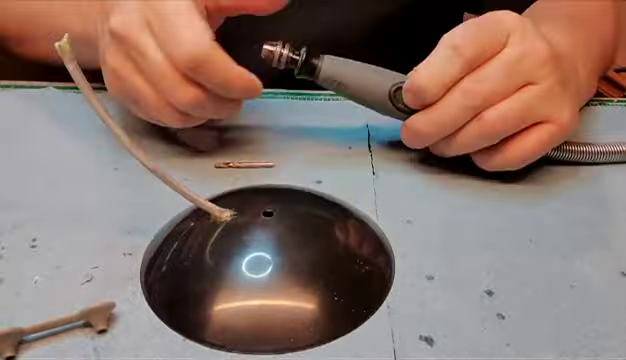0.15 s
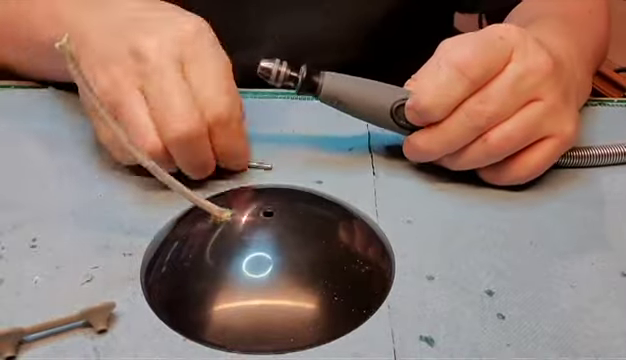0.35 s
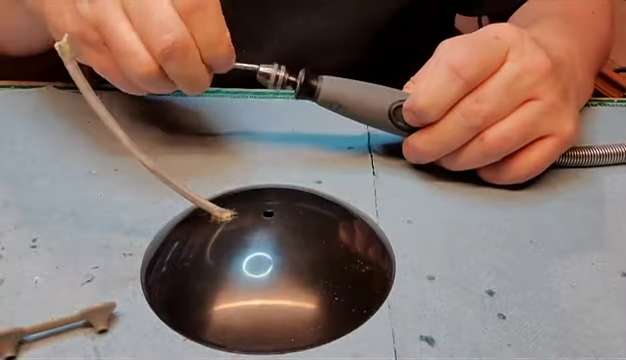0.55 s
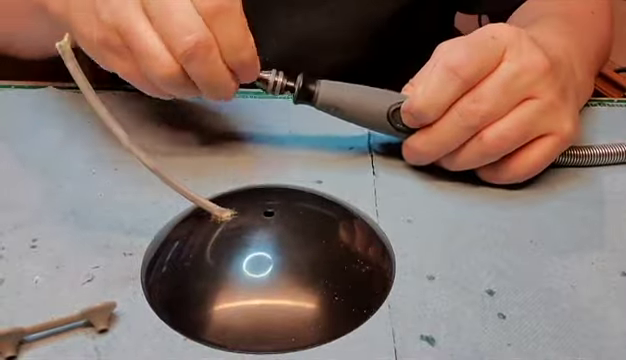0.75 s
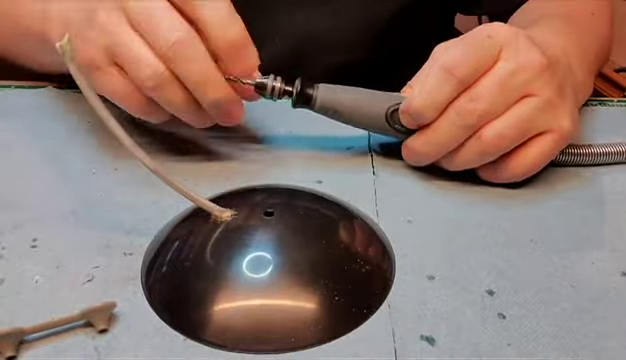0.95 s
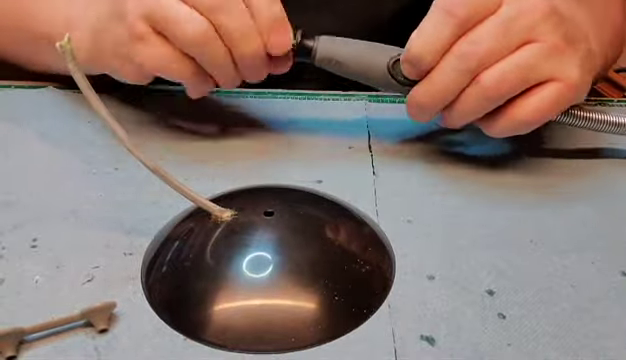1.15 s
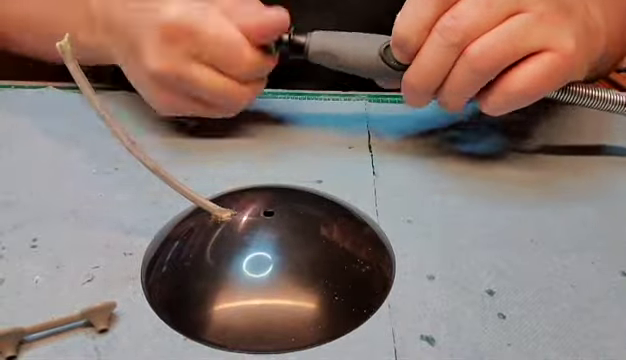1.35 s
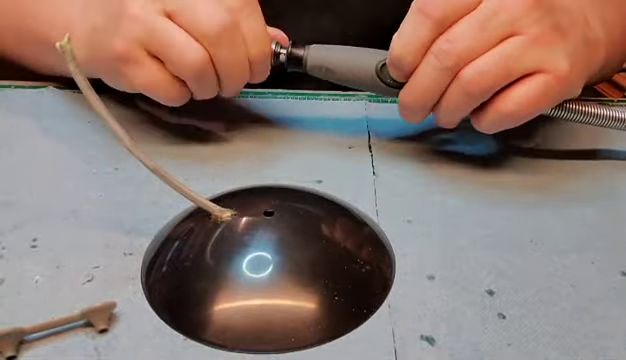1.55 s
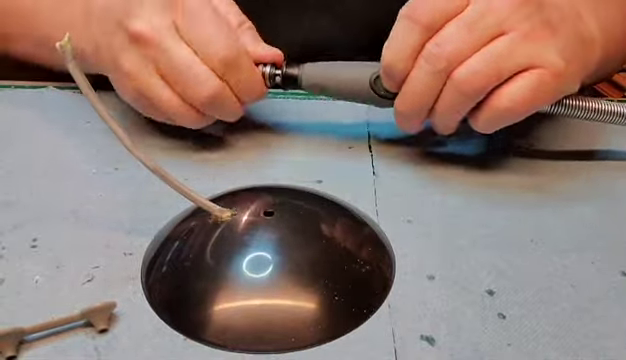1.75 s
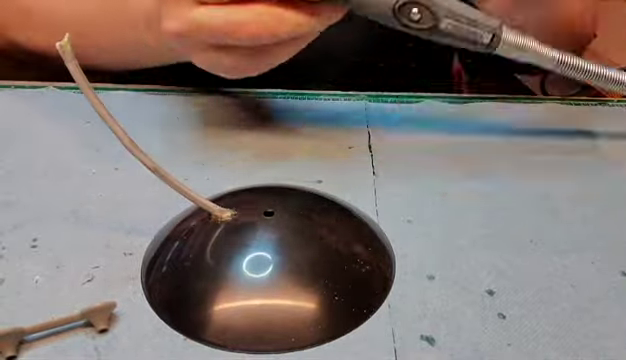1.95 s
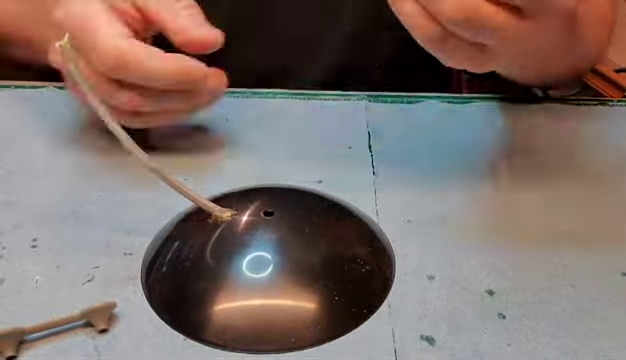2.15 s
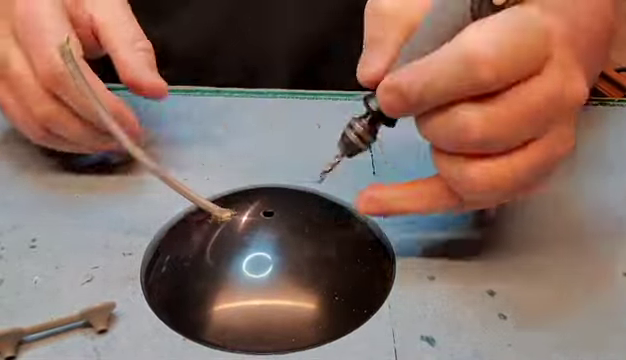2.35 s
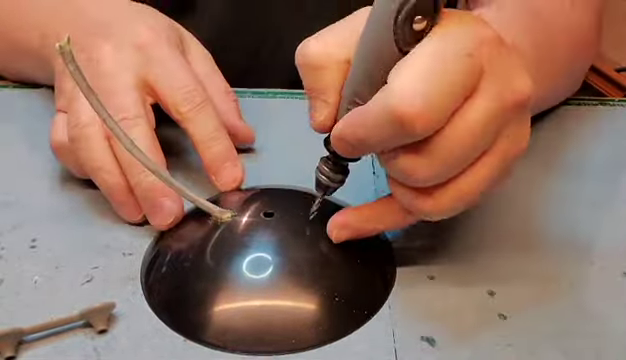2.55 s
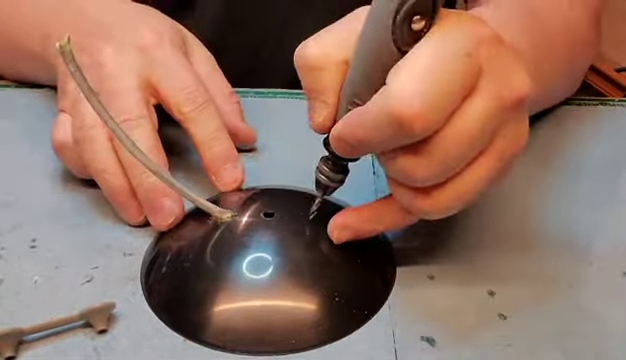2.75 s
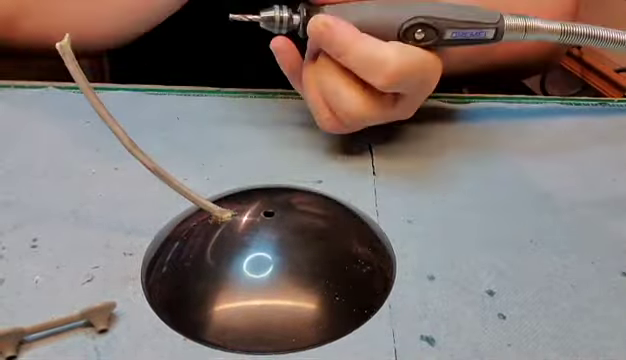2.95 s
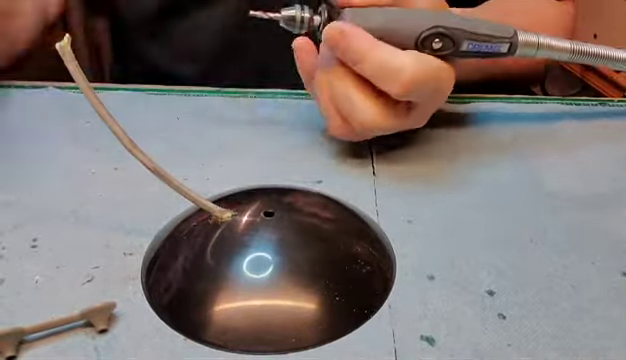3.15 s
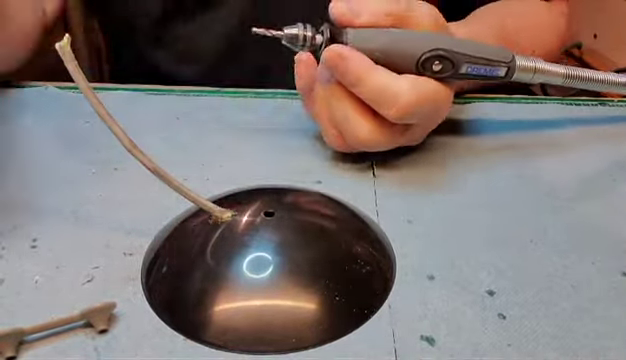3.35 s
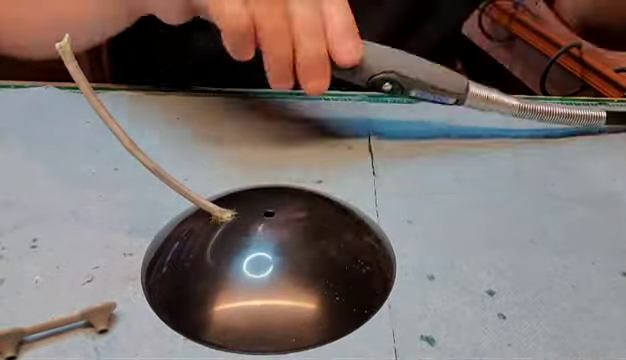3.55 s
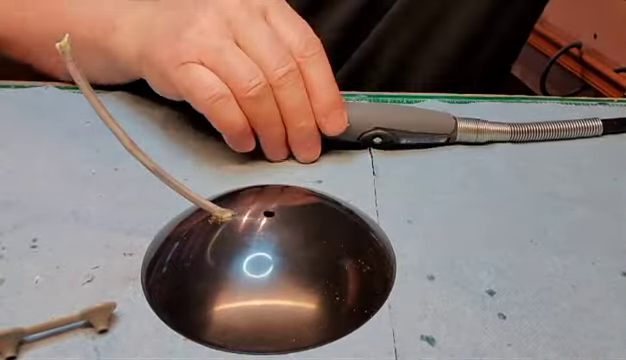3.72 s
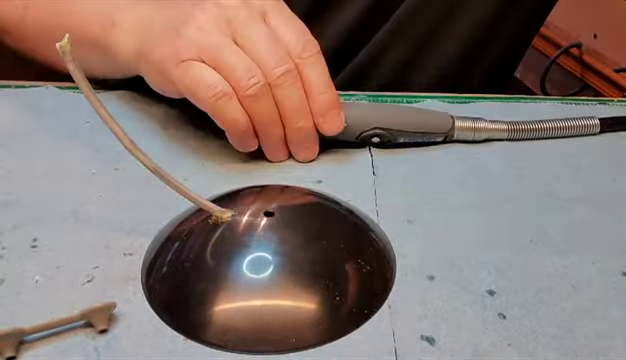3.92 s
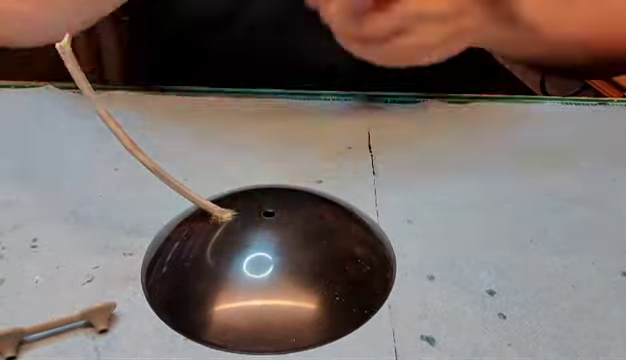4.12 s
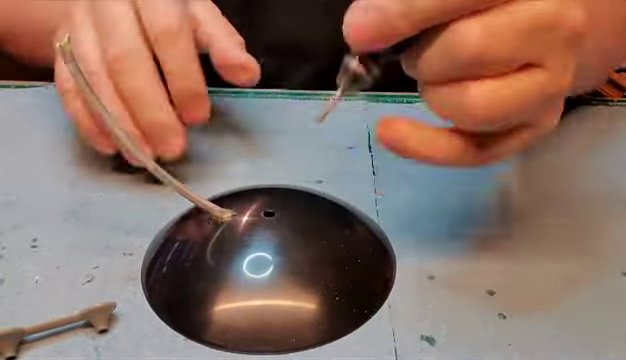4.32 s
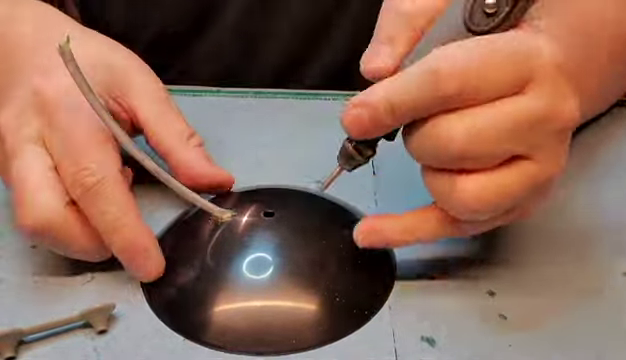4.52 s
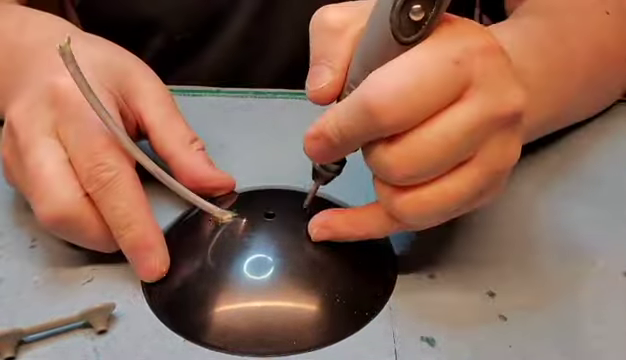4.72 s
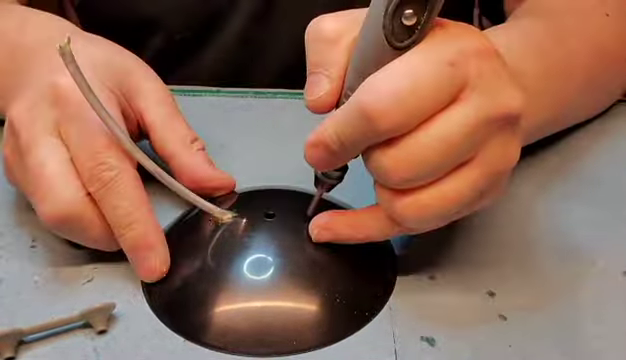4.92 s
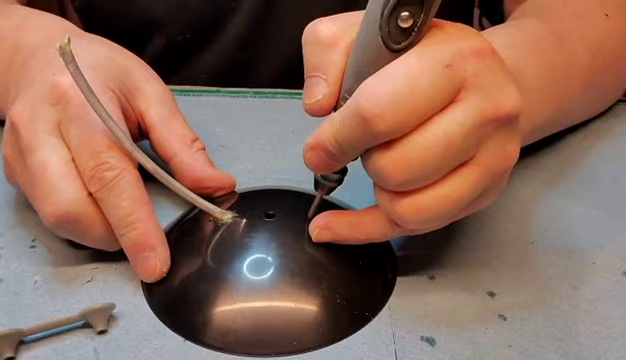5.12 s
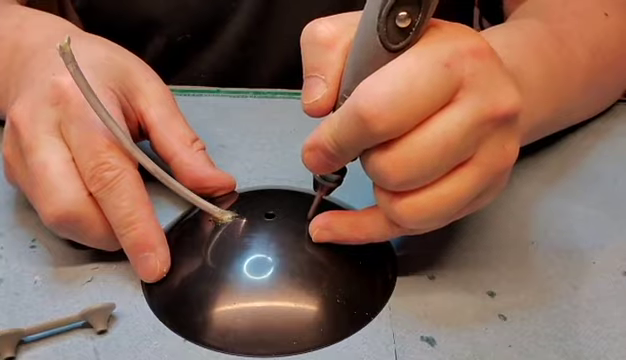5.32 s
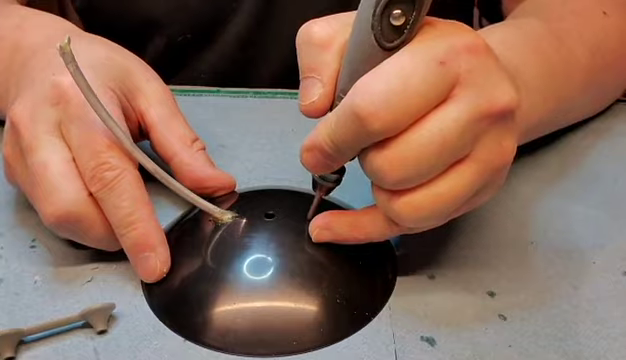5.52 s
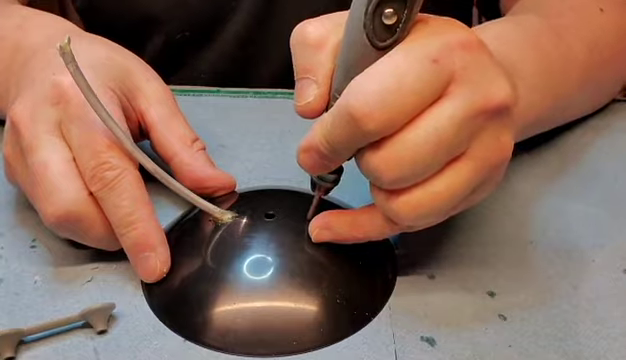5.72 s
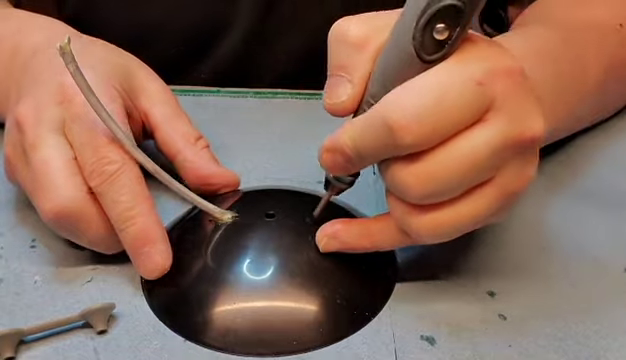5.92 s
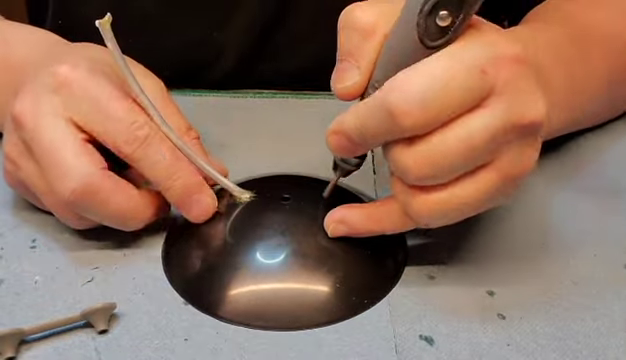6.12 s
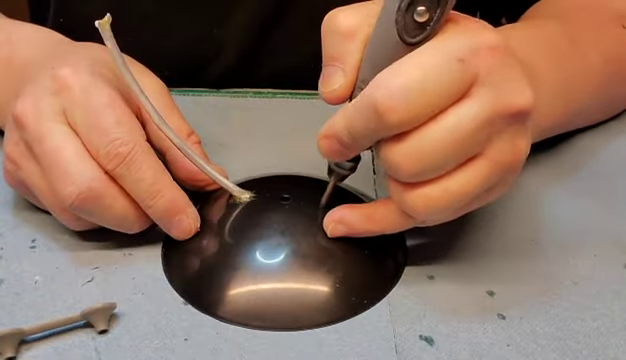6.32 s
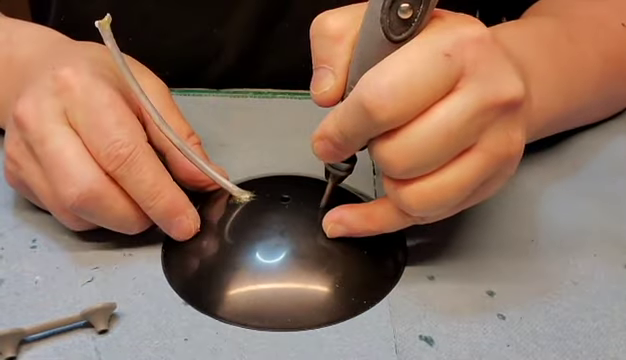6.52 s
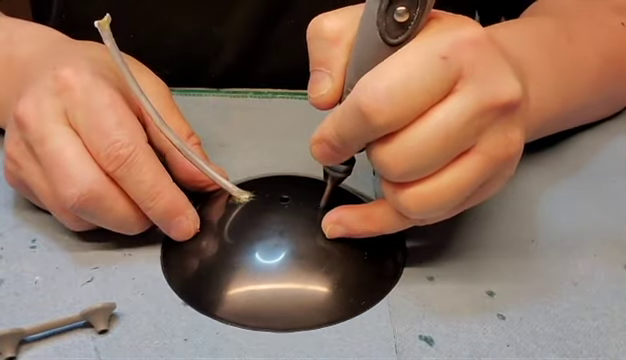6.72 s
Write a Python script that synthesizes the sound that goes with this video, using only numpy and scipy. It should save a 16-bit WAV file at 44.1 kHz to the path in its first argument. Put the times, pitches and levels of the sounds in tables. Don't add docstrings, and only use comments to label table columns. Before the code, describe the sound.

Nearly four seconds of very quiet fumbling: ticks of chuck and bit, brushing sleeves, muted thuds on the bench, a far engine hum growing behind. A sharp switch click starts a small high-speed motor, which howls upward within half a second into steady airy whine. Two buzzing presses on plastic follow, then free running, hard crackling chatter and short final bites. Close stereo microphone, dry small room, tool slightly left.

```python
import sys
import numpy as np
from scipy import signal
from scipy.io import wavfile
from scipy.ndimage import uniform_filter1d

SR = 44100
rng = np.random.default_rng(int(sys.argv[2]) if len(sys.argv) > 2 else 0)


def int16_out(signal):
    q = np.round(np.clip(np.atleast_2d(signal).T, -1, 1) * 32767)
    wavfile.write(sys.argv[1], SR, q.astype(np.int16))


def voltage_ratio(level):
    return 10 ** (np.asarray(level, float) / 20)


N = 302967

# [time_s, turns_hz]
SPEED = [(3.83, 278.5), (3.89, 347.6), (3.92, 469.4), (3.96, 568), (3.99, 635), (4.055, 716), (4.128, 775),
         (4.2, 797), (4.31, 826.6), (4.62, 868), (5.07, 886), (5.41, 895.8), (5.8, 883.3), (6.02, 907),
         (6.27, 919.7), (6.46, 923.3), (6.62, 897), (6.82, 851.5)]
# first, second, third and upper orders, then cutting noise [level_db]
SNAG_DB = (-19, -3.5, -25, -22, -5.5)
START_S = SPEED[0][0]
RIPPLE_HZ = 360
WOBBLE = 0.067
TOUCH_EDGE_S = 0.006


def since(s):
    return np.arange(N) / SR - s


def curve(rows):
    s, *columns = np.transpose(rows)
    return [np.interp(since(0), s, column) for column in columns]


def evened(x):
    return x / np.sqrt(np.mean(x ** 2) + 1e-20)


def read(points, hz):
    f, value = np.transpose(points)
    return np.interp(np.log(hz + 1), np.log(f + 1), value)


def drift(seconds):
    width = max(round(seconds * SR), 2)
    wander = uniform_filter1d(rng.standard_normal(N), width)
    return evened(uniform_filter1d(wander, width))


def swell(start, attack, hold, release_db, db):
    t = since(start)
    return np.clip(t / attack, 0, 1) * voltage_ratio(db - release_db * np.maximum(t - attack - hold, 0))


def resonate(x, hz, width):
    turn = np.exp(2j * np.pi * np.cumsum(hz * np.ones(x.shape[-1])) / SR)
    r = np.exp(-np.pi * width / SR)
    return 2 * (turn * signal.lfilter([1 - r], [1, -r], x / turn)).real


def resonate_twice(x, hz, width):
    return resonate(resonate(x, hz, width), hz, width)


def noise(spectrum, patchy_db, size=512, near_left=False):
    # [frequency_hz, likeness]
    likeness = [(60, 0.95), (300, 0.97), (1000, 0.85), (2500, 0.3), (4500, 0.05), (8000, 0.75),
                (15000, 0.4)]
    # [frequency_hz, lead_rad]
    left_lead = [(400, -0.26), (1500, 1.6), (4000, 0.78), (6500, 2.4), (12000, -0.45)]
    frames, hz = 4 * N // size + 6, np.fft.rfftfreq(size, 1 / SR)
    a, b, c, d, patches = rng.standard_normal((frames, len(hz), 5)).T
    patches = uniform_filter1d(patches, size=8, axis=0)
    patches = evened(uniform_filter1d(patches, size=10, axis=1))
    same = np.clip(read(likeness, hz), 0, 1)[:, None]
    middle = a + 1j * b
    side = np.sqrt((1 - same) / (1 + same)) * (c + 1j * d)
    z = np.array([middle + side, middle - side])
    z *= np.exp(0.5j * near_left * np.outer([1, -1], read(left_lead, hz)))[:, :, None]
    z *= voltage_ratio(read(spectrum, hz)[:, None] + patchy_db * patches)
    return evened(signal.istft(z, nperseg=size, noverlap=size - size // 4)[1][:, :N])


def tone(hz, waver_db, blur, bend=0):
    lead = rng.uniform(0.15, 0.6) * np.clip(np.max(hz) / 3000, 0, 1) * np.array([[1], [-1]])
    phase = 2 * np.pi * np.cumsum(hz * np.ones(N)) / SR + blur * drift(0.025) + bend
    return np.sqrt(2) * voltage_ratio(waver_db * drift(0.025)) * np.sin(phase + lead)


def burst(t60, rise, hold, count=5000):
    t = np.arange(count) / SR
    decay = voltage_ratio(-60 * np.maximum(t - hold, 0) / t60) + 1.7 * np.exp(-t / 0.0027)
    common, apart = rng.standard_normal((2, count))
    return np.clip(t / rise, 0, 1) * decay * (common + 0.5 * apart * np.array([[1], [-1]]))


def add(mix, s, db, sound):
    part = mix[:, round(s * SR):][:, :sound.shape[1]]
    part += voltage_ratio(db) * sound[:, :part.shape[1]] / abs(sound.mean(0)).max()


def pressure(upper=False):
    # [start_s, end_s, first_pressure_db, last_pressure_db, upper_orders_db]
    touches = [
        (5.147, 5.45, 1, 0.5, -1),
        (5.445, 5.8, 3, -0.5, -4),
        (6.514, 6.676, 0, -4, 0.5),
        (6.694, 6.788, 3.5, 7, -15),
        (6.822, 6.898, -1.5, 7, 2),
    ]
    total = 0
    for start, end, first_db, last_db, upper_db in touches:
        gate = np.clip(np.minimum(since(start), -since(end)) / TOUCH_EDGE_S + 0.5, 0, 1)
        push_db = np.interp(since(0), (start, end), (first_db, last_db))
        total = total + gate * voltage_ratio(push_db + upper * upper_db)
    return total


def snags(axis):
    # [time_s, half_length_s, tone_db, rattle_db]
    catches = [(5.164, 0.027, -35.5, -49), (5.265, 0.049, -31.5, -52), (5.823, 0.013, -67, -42.5),
               (6.336, 0.061, -46, -47), (6.404, 0.072, -37, -35.5), (6.441, 0.015, -22, -30.5),
               (6.4658, 0.02, -21, -33), (6.55, 0.37, -76, -46), (6.73, 0.032, -57, -54),
               (6.774, 0.018, -32, -43), (6.802, 0.045, -39.5, -38), (6.843, 0.013, -33, -42),
               (6.872, 0.013, -42, -28)]
    return sum(voltage_ratio(row[axis]) * np.cos(0.5 * np.pi * np.clip(since(row[0]) / row[1], -1, 1)) ** 2
               for row in catches)


def motor():
    shaft = uniform_filter1d(curve(SPEED)[0], size=1800)
    t = since(START_S)
    hiss_db = -32 - 17 * np.clip(1 - t / 0.058, 0, 1) + 0.66 * drift(0.081)
    out = contact(shaft) - shaft_tone(shaft) + lines(shaft, hiss_db) + fan(shaft, hiss_db) + cutting()
    return np.clip(t / 0.034, 0, 1) * out


def shaft_tone(shaft):
    # [time_s, level_db]
    grip = [(3.83, -53), (3.9, -40), (3.925, -49), (3.953, -34.5), (4.01, -41.5), (4.09, -55), (4.51, -58),
            (4.57, -48), (5.05, -40), (5.83, -42), (5.91, -36), (6.06, -32.5), (6.3, -39.5), (6.49, -33.5),
            (6.69, -42), (6.785, -30), (6.803, -51), (6.87, -50)]
    # [start_s, end_s, share_lost]
    jam = (6.432, 6.478, 0.74)
    turn = 2 * np.pi * np.cumsum(shaft) / SR
    jammed = np.clip(np.minimum(since(jam[0]), -since(jam[1])) / TOUCH_EDGE_S, 0, 1)
    level = voltage_ratio(curve(grip)[0]) * (1 - jam[2] * jammed) + voltage_ratio(SNAG_DB[0]) * snags(axis=2)
    return np.sqrt(2) * level * voltage_ratio(0.8 * drift(0.012)) * np.cos(turn + 0.15 * np.array([[1], [-1]]))


def lines(shaft, level_db):
    multiples = (2.07, 3.065, 3.135, 4, 4.07, 5.07, 6.07, 7.065, 8, 12, 13, 14, 15, 16, 18)
    multiple_db = (-19, -31, -35, -24, -15.5, -28, -25, -22, -14.5, -17.5, -21.5, -24, -21, -16, -18)
    sidebands = ((0, 1), (0, 3.45), (0, 4), (8, -1), (8, 1), (8, 2), (16, -1), (16, 1), (16, 2))
    sideband_db = (-20, -39, -33.5, -18, -20, -20.5, -28, -16, -23)
    bunches = ((7.135, 1.2), (9.135, 1.5), (10.2, 1.1), (11.2, 1.8), (12.2, 1.9), (13.135, 1.6),
               (14.135, 1.5), (15.135, 1.5))
    bunch_db = (-20, -14.5, -16, -16, -13.5, -15, -25, -20)
    # [centre_hz, width_hz, lift_db]
    housing = (7000, 400, 5.5)
    # [centre_hz, width_hz, lift_db]
    grille = (11540, 900, 1.9)
    # [time_s, lift_db]
    cage = [(3.9, -22), (3.96, -13), (4.05, -0.5), (4.16, 0.5), (4.23, -7), (4.31, -14), (4.34, -0.5),
            (4.97, 2), (5.14, -3.5), (5.8, -8), (5.91, 3.5), (6.06, 2.5), (6.3, 2.5), (6.75, 4), (6.8, -3)]
    pressed_cage_db = (-47, -51.5)
    # [ripple_steps, start_s, attack_s, hold_s, release_db_per_s, level_db]
    cover = [
        (4, 4.27, 0.022, 0.035, 53, -55.5),
        (4, 5.85, .05, 0.17, 60, -64.5),
        (4.5, 4.2, 0.052, 0.081, 77, -57.5),
    ]

    rows = [(m, 0, 0, db) for m, db in zip(multiples, multiple_db)]
    rows += [(m, steps, 0, db) for (m, steps), db in zip(sidebands, sideband_db)]
    rows += [(m, 0, spread, db) for (m, spread), db in zip(bunches, bunch_db)]
    settled_db = np.minimum(0.061 * (shaft - 800), 0)
    cage_db = curve(cage)[0]
    run_up_db = 5 * np.clip(1 - since(START_S) / 0.45, 0, 1)
    wobble = 2 * np.pi * WOBBLE * np.cumsum(shaft) / SR
    press = pressure()
    uneven = np.clip(drift(0.08), -2, 1.2)
    out = sum(swell(*shape) * tone(steps * RIPPLE_HZ, 2.2, 0.1) for steps, *shape in cover)
    for multiple, steps, spread, db in rows:
        hz = multiple * shaft + steps * RIPPLE_HZ
        if 0 < multiple < 7:
            uneven_db = cage_db
        else:
            uneven_db = 2 * (spread > 0) * np.roll(uneven, rng.integers(N))
        lift_db = sum(top_db * np.exp(-((hz - centre) / width) ** 2)
                      for centre, width, top_db in (housing, grille))
        if (multiple, steps) == (8, 0):
            late_db = np.minimum(0.2 * (shaft - 690), 0)
        else:
            late_db = settled_db * (multiple > 7)
        start_db = run_up_db * ((2 < multiple < 3) - (4 <= multiple < 7))
        level = voltage_ratio(level_db + db + lift_db + uneven_db + late_db + start_db)
        if 2 < multiple < 3.1:
            level = level + voltage_ratio(pressed_cage_db[int(multiple) - 2]) * press
        if (multiple, steps) == (8, 1):
            level = level + voltage_ratio(-51.5) * np.minimum(press, 1)
        bend = spread * np.sin(wobble + multiple)
        out = out + level * tone(hz, 1.3 if multiple == 8 else 2.2, 0.025 * multiple, bend)
    return out


def fan(shaft, hiss_db):
    # [frequency_hz, density_db_per_hz]
    hiss = [(180, -38), (300, -24), (360, -33), (478, -24.5), (593, -3.5), (762, -81), (856, -16.5),
            (1080, -24.5), (1720, -10), (2280, -16.5), (2700, -7), (4910, -8.5), (6100, -2.5), (10700, 0.5),
            (16000, -7.5)]
    # [start_s, attack_s, hold_s, release_db_per_s]
    howl = (3.87, .045, .062, 450)
    # [start_s, attack_s, hold_s, release_db_per_s]
    whistle = (3.99, .04, .15, 40)
    t = since(START_S)
    turn = 2 * np.pi * np.cumsum(shaft) / SR
    puffs = 1 + (0.15 + 0.34 * np.clip(1 - t / 0.18, 0, 1)) * np.cos(turn)
    air = noise(hiss, 1.66, near_left=True) * puffs * voltage_ratio(0.83 * drift(0.005))
    howl_hz = np.clip(17 * shaft + 50, 7000, 10200)
    out = swell(*howl, db=-31.5) * evened(resonate_twice(air, howl_hz, 1100))
    blade_hz = np.minimum(18 * shaft, 16500)
    out += swell(*whistle, db=-41) * tone(blade_hz, 1.6, 1.9)
    air = air - 0.75 * np.clip(1 - t / 0.6, 0, 1) * resonate(air, 4200, 1800)
    return out + voltage_ratio(hiss_db + 0.3) * air


def cutting():
    # [frequency_hz, density_db_per_hz]
    shear = [(88, -53), (150, -58), (308, 12), (764, -22.5), (922, -1), (1490, -2), (1830, -6), (2290, -7),
             (2490, -17), (4860, -8.5), (9000, 3.5), (11700, -59), (19800, -120)]
    t = since(START_S)
    spin_up_db = 12 * np.clip(1 - t / 0.54, 0, 1)
    level = voltage_ratio(-50 + spin_up_db) * np.clip(t / 0.082, 0, 1) ** 0.57
    level += voltage_ratio(SNAG_DB[4]) * snags(axis=3)
    return level * noise(shear, 3.1, near_left=True) * voltage_ratio(2.2 * drift(0.0034))


def contact(shaft):
    # second, third and upper orders [level_db]
    idle_db = (-62, -49, -56.5)
    # the same orders, then chatter [level_db]
    press_db = (-44.5, -40.5, -46, -50)
    # [start_s, attack_s, hold_s, release_db_per_s]
    fifth = (5.15, .008, .15, 90)
    free = np.clip((shaft - 800) / 80, 0, 1)
    presses = pressure(), pressure(), pressure(upper=True)
    snag = snags(axis=2)
    second, third, upper = (voltage_ratio(a) * free + voltage_ratio(b) * press + voltage_ratio(c) * snag
                            for a, b, c, press in zip(idle_db, press_db, SNAG_DB[1:], presses))
    top = upper * voltage_ratio(-8.5) + swell(*fifth, db=-50.5)
    turn = 2 * np.pi * np.cumsum(shaft) / SR
    steady = np.clip(1 - snag / 0.03, 0, 1)
    out = np.zeros((2, N))
    for order, level in enumerate((second, third, upper, top), start=2):
        throb = 1 + 0.33 * steady * np.cos(WOBBLE * turn + order + 1.2 * drift(0.04))
        phase = order * turn + 0.47 * drift(0.0047) + 0.13 * order * np.array([[1], [-1]])
        out -= np.sqrt(2) * level * voltage_ratio(1.28 * drift(0.011)) * throb * np.cos(phase)
    return out


def chatter():
    # second, third and upper orders, then chatter [level_db]
    pressed_db = (-44.5, -40.5, -46, -50)
    # [time_s, peak_db]
    strikes = [(5.8207, -23), (6.3183, -25), (6.3234, -22), (6.338, -19), (6.355, -16.5), (6.359, -24),
               (6.3757, -17), (6.3885, -26), (6.3958, -19), (6.4215, -17), (6.436, -28), (6.4375, -25),
               (6.4415, -22), (6.4436, -27), (6.4567, -16.5), (6.4594, -16), (6.4611, -10), (6.4702, -10),
               (6.7014, -24.5), (6.8381, -20)]
    # [time_s, peak_db, pitch_hz]
    pings = [
        (3.895, -40.5, 2640),
        (6.793, -27, 4100),
        (6.8, -34, 5275),
        (6.85, -30, 3860),
    ]
    blow_size = voltage_ratio(3.5 * np.minimum(rng.exponential(1, N), 1.5))
    blows = (rng.random(N) < 900 / SR) * blow_size * rng.choice([-1, 1], N)
    ring, crack = dome(blows)
    rattle = snags(axis=3)
    out = (voltage_ratio(pressed_db[3]) * pressure() + rattle) * evened(ring + 0.83 * crack) * voltage_ratio([[0.4], [-0.4]])
    thud = resonate(resonate(blows, 298, 130), 294, 130)
    out += voltage_ratio(-15.5) * rattle * evened(thud)
    for s, db in strikes:
        blow = burst(0.004, 0.00015, 0.0001, count=1500) * np.exp(-np.arange(1500) / 38)
        ring, crack = dome(blow)
        add(out, s, db - 2.5, 0.75 * ring + crack)
    for s, db, hz in pings:
        add(out, s, db, resonate_twice(burst(0.12, 0.005, 0.004), hz, 140))
    return out


def dome(blows):
    # [pitch_hz, width_hz, level_db]
    modes = [(326, 120, -11.5), (1930, 130, 1.5), (2485, 160, 13), (2640, 230, 8), (3674, 250, -26),
             (4100, 101, -34)]
    ring = sum(voltage_ratio(db) * resonate(blows, hz, width) * SR / width / 100 for hz, width, db in modes)
    crack = signal.lfilter(*signal.butter(2, [1100, 5000], "bandpass", fs=SR), blows)
    return evened(ring), evened(crack)


def handling():
    out = rubbing()
    clicks(out)
    scuffing(out)
    knocking(out)
    scraping(out)
    return signal.lfilter(*signal.butter(2, 100, "highpass", fs=SR), out)


def rubbing():
    # [time_s, level_db]
    rub = [(0.0, -78), (0.2, -79.5), (0.31, -71), (0.45, -76.5), (0.71, -75), (0.9, -73.5), (1.1, -71.5),
           (1.25, -71.5), (1.42, -72), (1.63, -78.5), (1.98, -71), (2.3, -73), (2.71, -71.5), (3.05, -77.5),
           (3.3, -80.5), (3.76, -72.5)]
    # [frequency_hz, density_db_per_hz]
    sleeve = [(900, -11), (1400, -4), (1900, -10.5), (2200, -5), (2800, -2), (3050, -14), (3400, -8.5),
              (4000, -13.5), (4400, -11.5), (4700, -18.5), (6000, -17.5), (8000, -63)]
    skin = [(3000, -34), (6000, 1.0), (10000, 0.0), (15000, -5.5)]  # frequency_hz, density_db_per_hz
    rub_db = curve(rub)[0]
    running = np.clip(since(START_S - 0.05) / 0.044, 0, 1)
    skin_level = (running < 1) * voltage_ratio(-88.5 + 0.41 * (rub_db - rub_db.mean()))
    out = skin_level * noise(skin, 2.1) * voltage_ratio(0.92 * drift(0.006))
    return out + (voltage_ratio(rub_db) + running * voltage_ratio(-62)) * noise(sleeve, 1.9)


def clicks(out):
    # [time_s, peak_db, centre_hz, lower_part_db]
    ticks = [(0.055, -43, 13400, -21), (0.194, -51, 12000, -2), (0.4898, -52, 10500, -25),
             (0.5352, -65, 13600, -17), (0.6723, -46, 11900, -2), (0.7287, -57, 10700, 1),
             (0.7677, -58.5, 11200, -19), (1.0365, -61, 14920, -23), (1.0858, -55, 13600, 5),
             (1.1588, -59, 7160, -7), (1.2216, -57, 9550, 6), (1.293, -48, 10720, 2),
             (1.3217, -56, 12300, 10), (1.7923, -67, 7700, 1), (2.1132, -61, 7300, 23),
             (2.826, -55, 5890, -20), (2.872, -42, 7800, -1), (3.262, -56, 14700, 2),
             (3.3308, -59, 9700, 4), (3.693, -50.5, 6290, -22), (3.764, -37.5, 11500, -28),
             (3.7714, -45, 8400, -31.5), (3.83, -33.5, 8100, -25), (3.8386, -28, 8800, -28),
             (3.851, -35, 7350, -25)]
    for s, db, hz, lower_db in ticks:
        tick = bright(burst(0.07, 0.0005, 0.0012), hz, lower_db)
        add(out, s, db, signal.lfilter(*signal.butter(4, 3600, "highpass", fs=SR), tick))


def scuffing(out):
    # [time_s, peak_db, centre_hz, lower_part_db, length_s]
    scuffs = [(0.0, -59, 10000, 0, 0.054), (0.047, -47, 9900, 3, 0.037), (0.165, -58, 11200, 1, 0.025),
              (0.185, -56.5, 8700, -28, 0.03), (0.294, -64, 9000, 21, 0.041), (0.445, -64, 7000, -2, 0.016),
              (0.478, -66, 10500, -20, 0.023), (0.69, -68, 13000, -15, .012), (1.06, -62, 14080, -5, .015),
              (1.168, -65, 11000, -2, .016), (1.288, -57, 10500, -9, 0.018), (2.026, -69, 6910, -1, 0.017),
              (2.073, -61.5, 13000, 9, 0.026), (2.15, -65, 13300, 8, .02), (2.423, -65, 9600, 16, 0.1),
              (2.476, -64.5, 10350, 17, 0.07), (3.274, -58.5, 8300, 15, 0.037),
              (3.448, -68.5, 7000, 5, 0.099), (3.762, -53, 7800, -13, 0.11)]
    for s, db, hz, lower_db, length in scuffs:
        add(out, s, db, bright(burst(0.066 + length, 0.3 * length, 0.63 * length), hz, lower_db))


def bright(x, hz, lower_db):
    wide = signal.lfilter(*signal.butter(3, 6500, "highpass", fs=SR), x)
    peak = resonate_twice(x, hz, 3400)
    lower = resonate(x, 3340, 3900)
    return 0.5 * evened(wide) + evened(peak) + voltage_ratio(lower_db) * evened(lower)


def knocking(out):
    # [time_s, peak_db, low_thump_db, clack_db]
    knocks = [(0.056, -58, -6, -23), (1.167, -49.5, -15, -16), (1.709, -54.5, -16, -25),
              (2.024, -54.5, -15, -21), (2.079, -52, -23, -12), (2.272, -57, -18, -20),
              (2.449, -57, -12, -12), (2.828, -46.5, -10, -26), (2.872, -39.5, 11.5, 1),
              (2.91, -64, 22, -21), (3.181, -57, 6, -10), (3.456, -47.5, -24, -36),
              (3.694, -45.5, -13, -20)]
    for s, db, thump_db, clack_db in knocks:
        x = burst(0.074, 0.003, 0.0059)
        x = 0.7 * x.mean(0) + 0.3 * x
        body = evened(resonate_twice(x, 569, 230)) + 0.32 * evened(resonate_twice(x, 830, 300))
        clack = resonate(resonate(x, 2300, 800), 2900, 720) + 0.6 * resonate_twice(x, 1500, 500)
        thump = resonate(resonate(x, 273.3, 65), 193, 94)
        thump = thump + 0.76 * resonate(resonate(x, 387, 82), 350, 130)
        add(out, s, db, body)
        add(out, s, db + clack_db, clack)
        add(out, s, db + thump_db, thump)
    set_down = burst(0.25, 0.021, 0.12, count=9000)
    add(out, 3.75, -52, resonate(resonate(set_down, 140, 50), 137, 50))


def scraping(out):
    # [time_s, peak_db, pitch_hz, length_s]
    scrapes = [
        (0.287, -66, 3460, 0.028),
        (0.794, -63.5, 2230, 0.17),
        (1.36, -66, 2500, 0.09),
        (2.98, -66, 2400, 0.019),
        (5.199, -41, 1400, 0.098),
        (4.51, -47.5, 589, .1),
    ]
    for s, db, hz, length in scrapes:
        drag = burst(0.1 + length, 0.5 * length, length, count=12000)
        add(out, s, db, resonate_twice(drag, hz, 450))


def room():
    # [frequency_hz, density_db_per_hz]
    rumble = [(15, -72), (25, -17), (70, -38), (145, -3), (309, -7), (363, -6.5), (531, -20), (714, -24.5),
              (840, -27), (1840, -36.5), (2690, -35), (4030, -64), (16000, -59)]
    # [time_s, pitch_hz, level_db]
    engine = [(0.0, 262, -61), (0.5, 280, -63), (0.8, 306, -61.5), (1.27, 345, -64), (1.56, 355.5, -62),
              (1.85, 347.7, -70.5), (2.34, 352, -51.5), (3.04, 387, -55), (3.42, 365.2, -45.5),
              (3.77, 374, -59), (3.95, 382.2, -39.5)]
    # [pitch_hz, level_db]
    ballast = [
        (721.4, -76.5),
    ]
    hz, drone_db = curve(engine)
    fade = np.clip(-since(engine[-1][0]) / 0.069, 0, 1)
    falter_db = 3 * drift(0.033) * (since(2.1) < 0)
    drone = fade * voltage_ratio(drone_db + falter_db) * tone(hz + 2.5 * drift(0.079), 2.6, 0.074)
    strand_level = fade * (since(1.5) < 0) * voltage_ratio(drone_db - 5.5 + 3 * drift(0.08))
    drone += strand_level * tone(0.86 * hz, 2.6, 0.3)
    buzz = voltage_ratio(ballast[0][1]) * tone(ballast[0][0], 0.37, 0.038)
    hum = fade * voltage_ratio(-70) * tone(RIPPLE_HZ, 2.5, 0.2)
    level_db = -59.5 - 4 * np.clip(since(START_S) / 3.4, 0, 1)
    return voltage_ratio(level_db) * noise(rumble, 0.86, size=2048) + drone + buzz + hum


def scene():
    return (motor() + chatter()) * voltage_ratio([[0.45], [-0.45]]) + handling() + room()


def band_limit(x):
    return signal.sosfilt(signal.butter(12, 16660, fs=SR, output="sos"), x)


def record(dry):
    return band_limit(dry)


dry = scene()
out = record(dry)
int16_out(out)
```